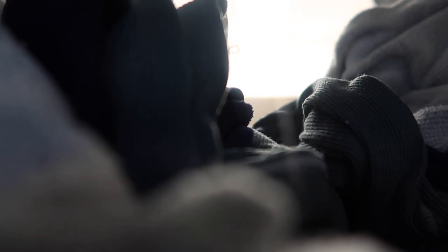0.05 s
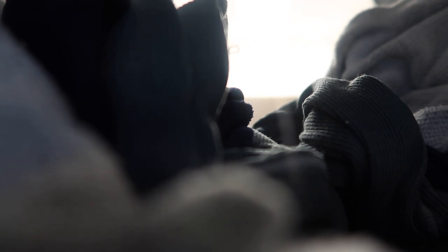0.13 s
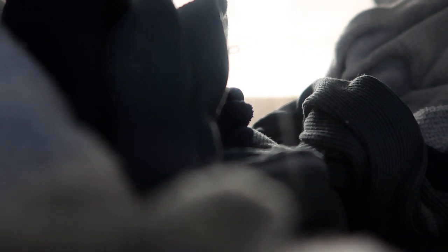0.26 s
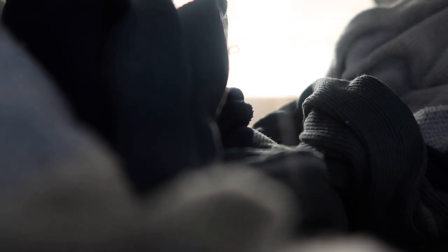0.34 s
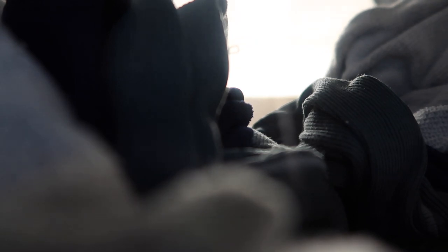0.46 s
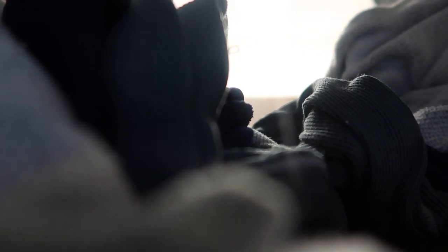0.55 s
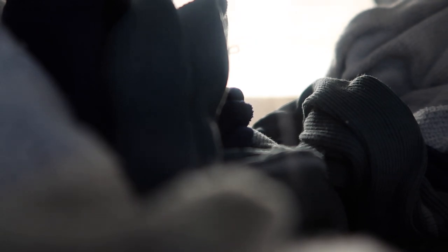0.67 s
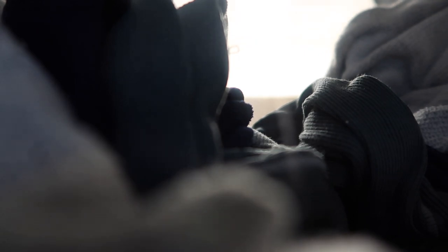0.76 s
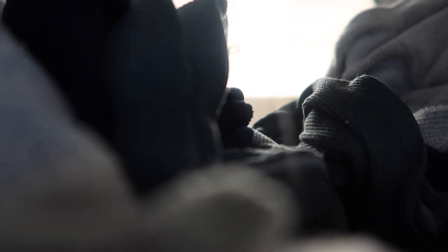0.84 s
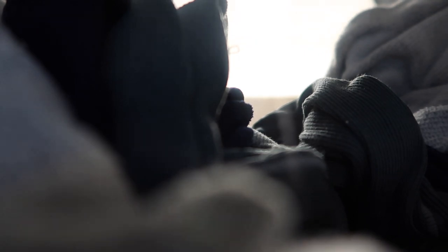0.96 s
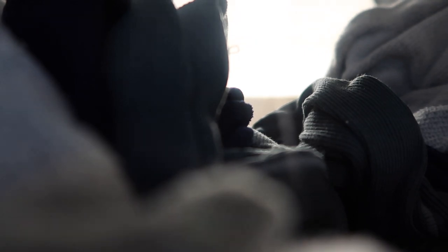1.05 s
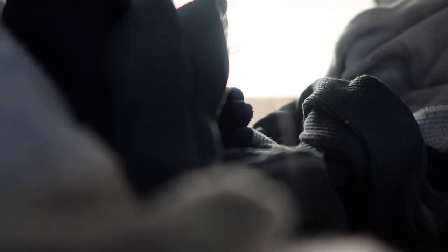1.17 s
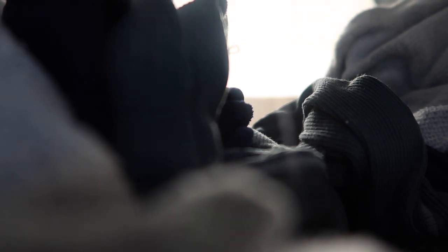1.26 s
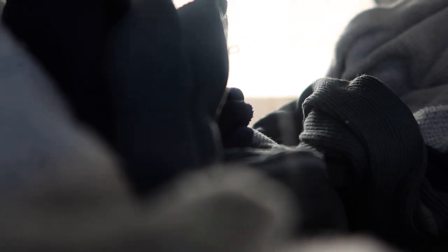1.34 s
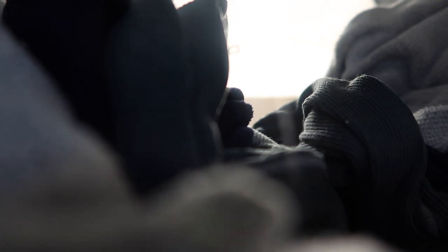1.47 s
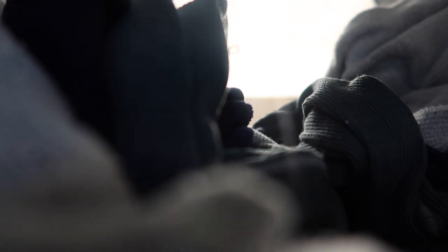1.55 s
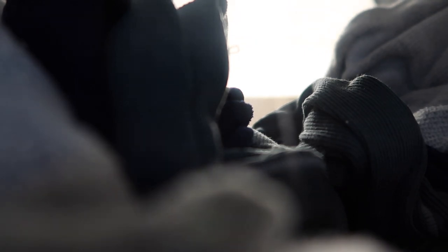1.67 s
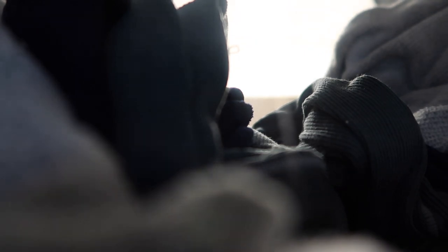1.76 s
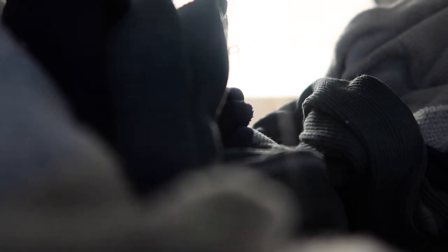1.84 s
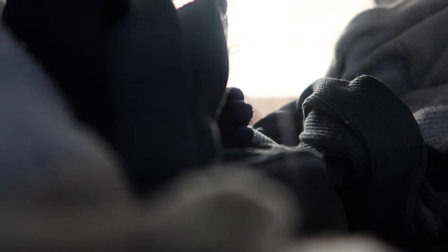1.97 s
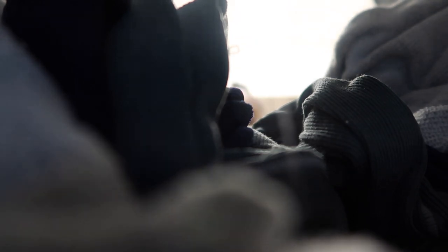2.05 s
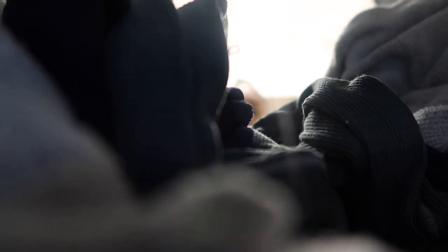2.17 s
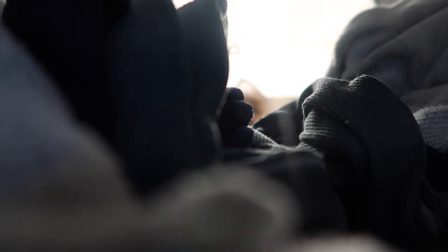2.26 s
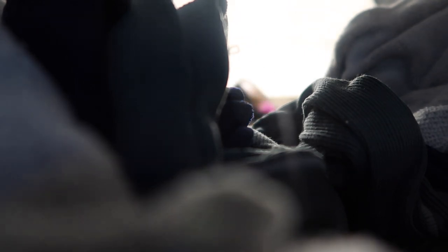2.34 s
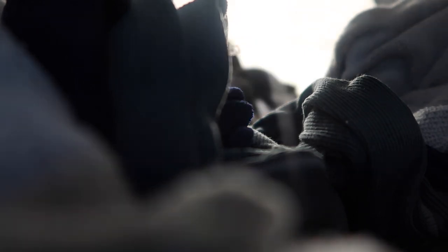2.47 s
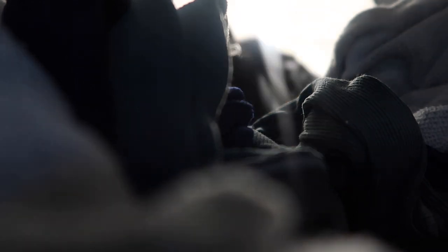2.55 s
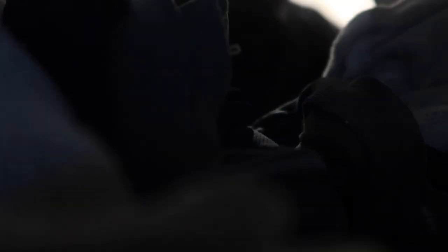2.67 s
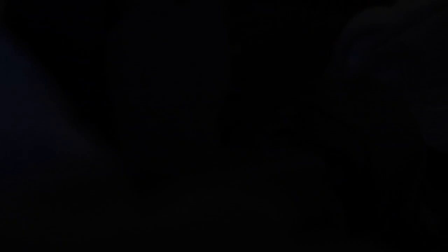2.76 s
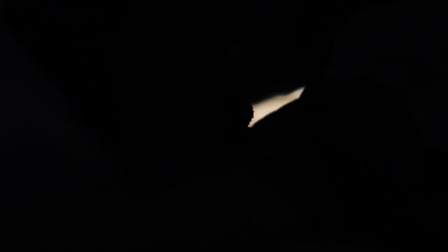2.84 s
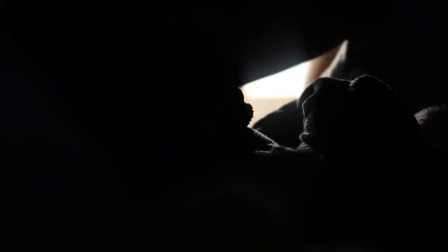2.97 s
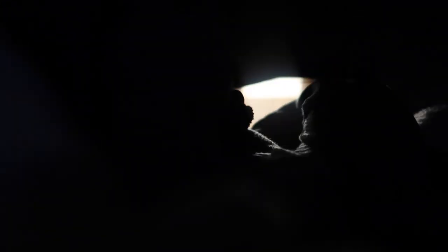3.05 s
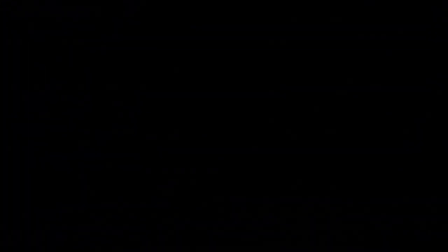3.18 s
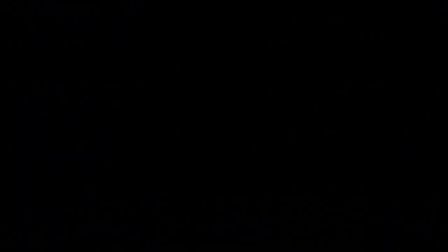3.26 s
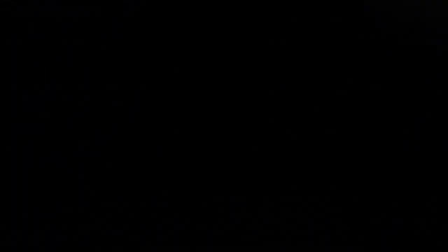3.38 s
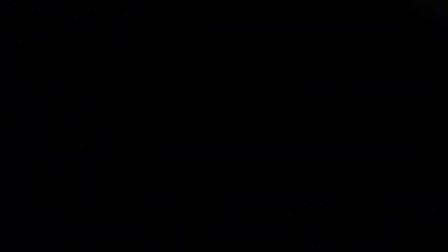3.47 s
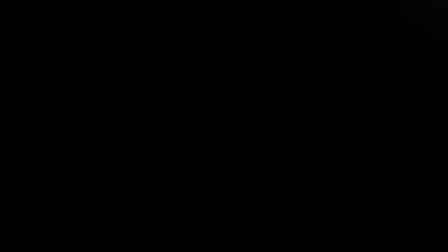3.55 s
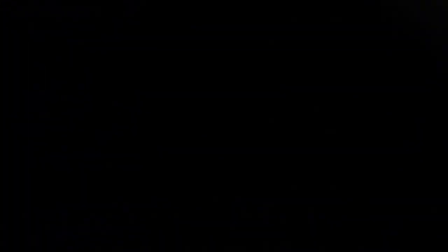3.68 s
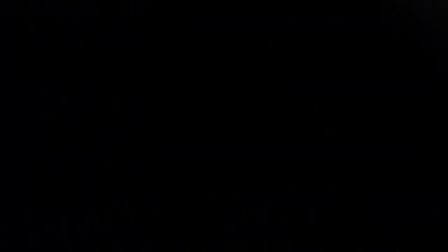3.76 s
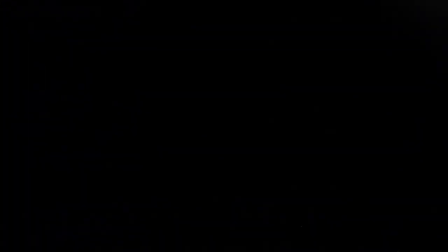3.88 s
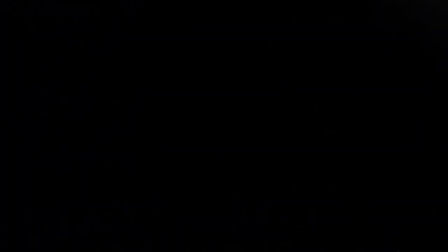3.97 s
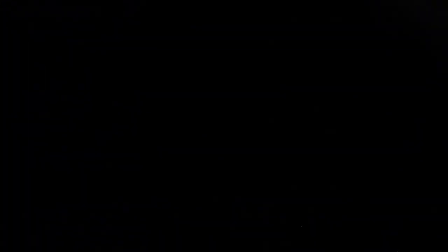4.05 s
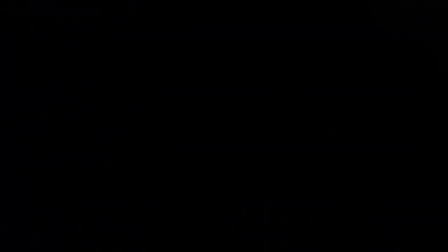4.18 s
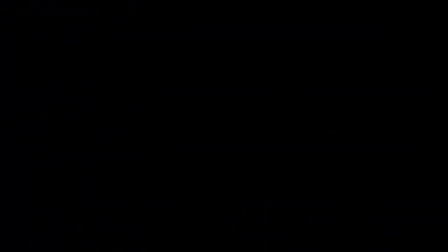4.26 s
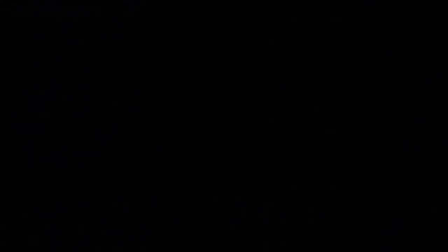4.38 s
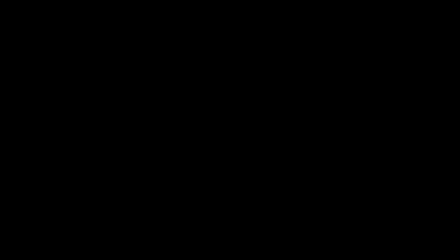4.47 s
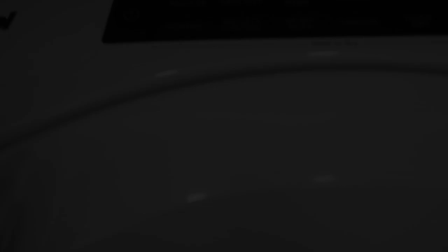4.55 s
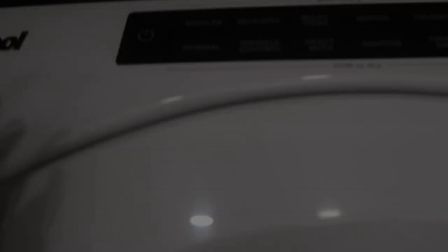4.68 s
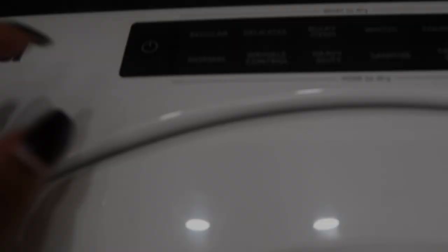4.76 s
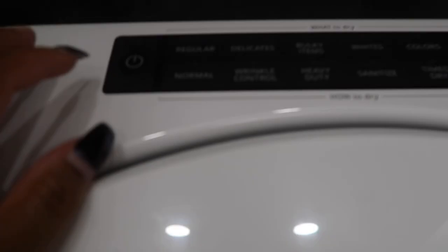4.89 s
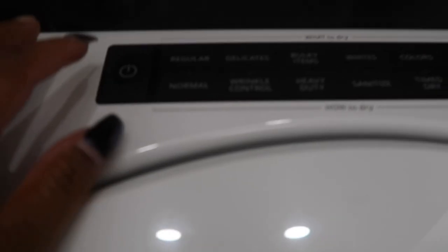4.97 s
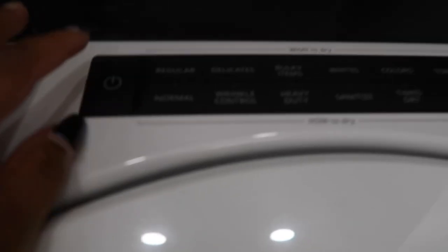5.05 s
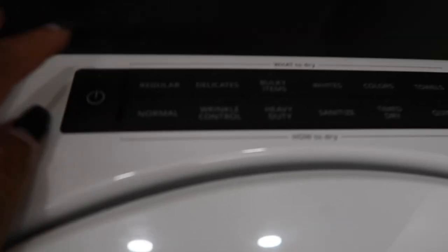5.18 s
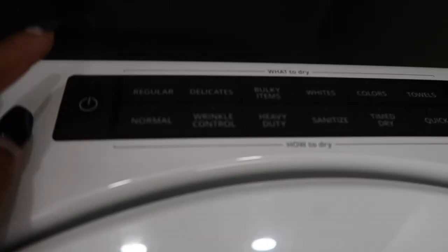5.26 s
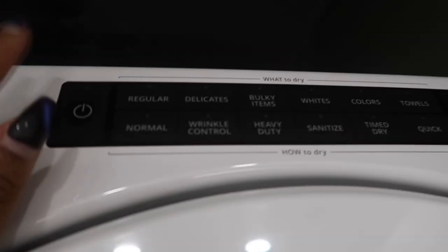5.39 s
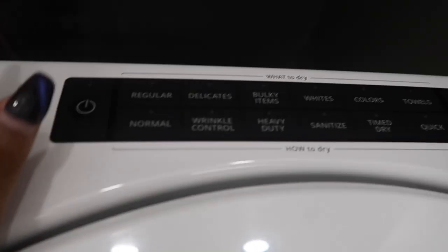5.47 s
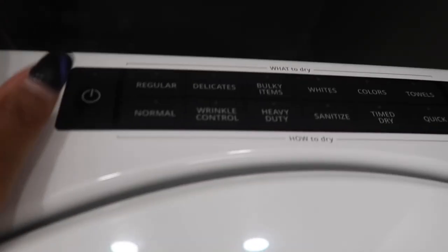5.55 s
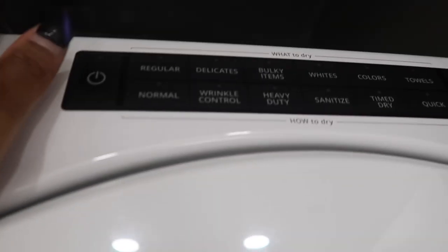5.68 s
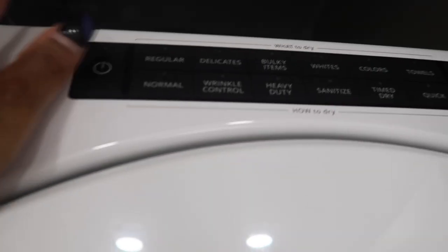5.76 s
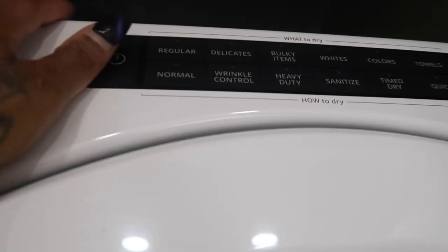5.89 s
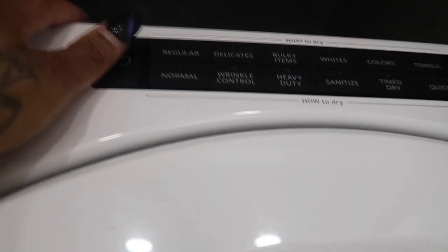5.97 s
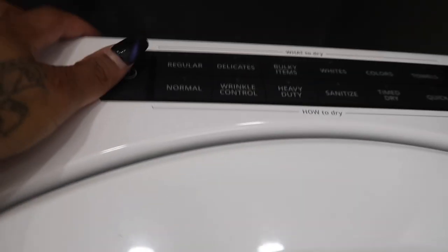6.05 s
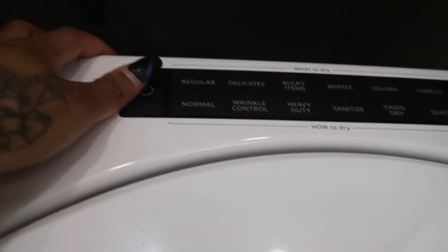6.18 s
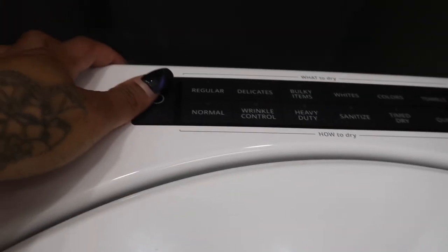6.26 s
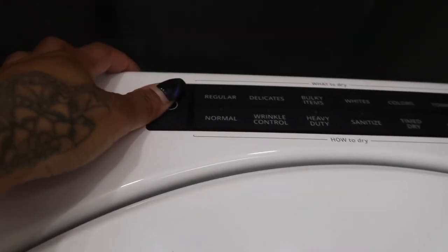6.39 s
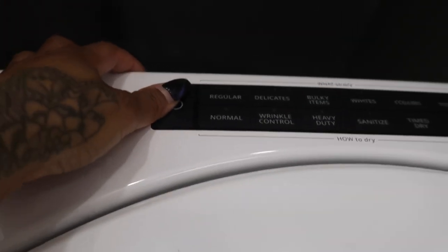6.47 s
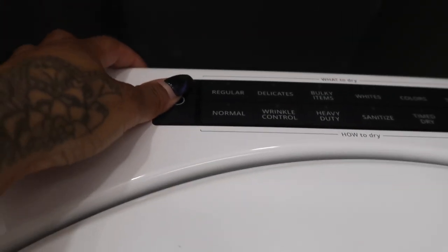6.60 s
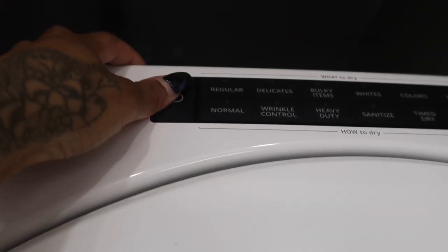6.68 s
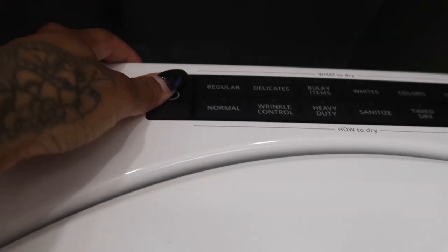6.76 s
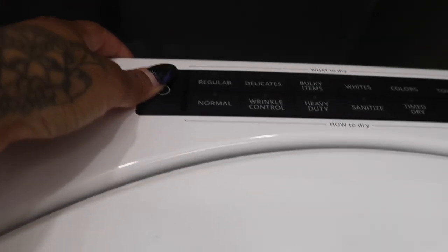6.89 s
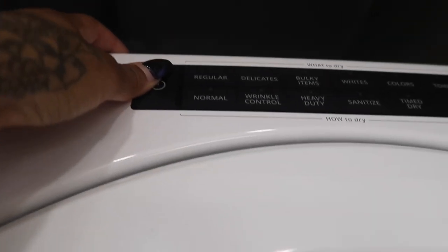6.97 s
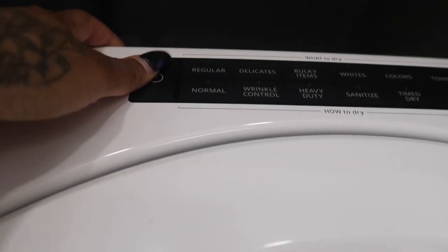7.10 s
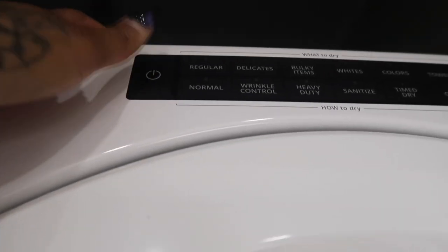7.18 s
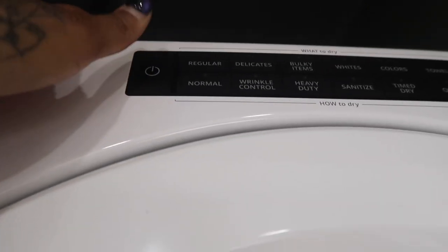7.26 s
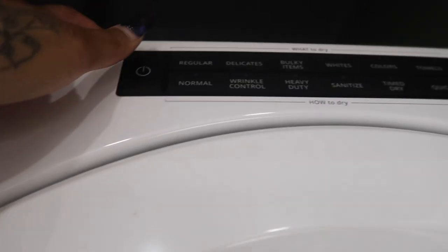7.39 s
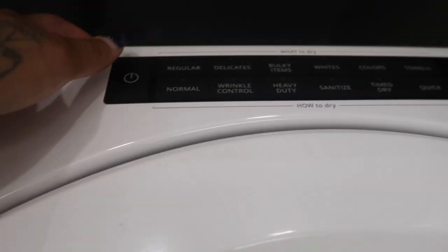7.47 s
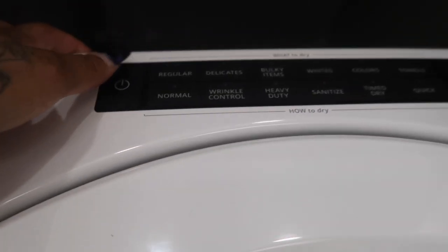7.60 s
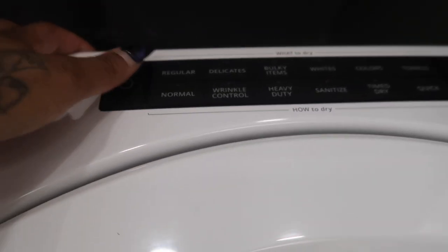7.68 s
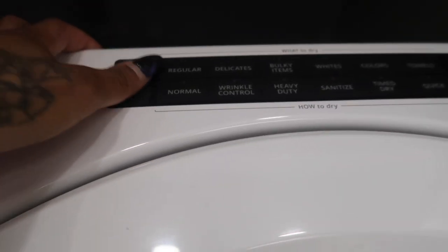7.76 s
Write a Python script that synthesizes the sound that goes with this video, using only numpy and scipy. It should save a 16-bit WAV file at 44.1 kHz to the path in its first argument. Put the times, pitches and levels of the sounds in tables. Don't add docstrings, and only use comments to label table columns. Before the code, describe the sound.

Muffled fabric swishes, a load thuds and a dryer door bangs shut with latch rattle; later, light knocks and nail clicks on the panel.

```python
import sys
import numpy as np
from scipy import signal
from scipy.fft import rfft, irfft, next_fast_len
from scipy.io import wavfile
from scipy.ndimage import uniform_filter1d, minimum_filter1d

SR = 44100
rng = np.random.default_rng(int(sys.argv[2]) if len(sys.argv) > 2 else 0)


def inscribe(sig):
    pcm = np.round(np.clip(np.atleast_2d(sig).T, -1, 1) * 32767)
    wavfile.write(sys.argv[1], SR, pcm.astype(np.int16))


def elevation(decibels):
    levels = np.asarray(decibels, float)
    return 10 ** (levels / 20)


N = 345325

# frequency in Hz, level in dB, T60 in seconds.
CATCH_MODES = [(684, -3.5, 0.059), (1335, -4.5, 0.11), (1504, 0, .052), (1630, -2, 0.076),
               (2089, -8, 0.084), (2660, -9.5, 0.14), (3610, -13, 0.071), (3989, -12, .067),
               (5120, -14, 0.065)]


def evened(x):
    return x / np.sqrt(np.mean(x ** 2) + 1e-20)


def read(points, hz):
    f, value = np.transpose(points)
    return np.interp(np.log(hz + 1), np.log(f + 1), value)


def add(mix, s, sound):
    part = mix[..., round(s * SR):][..., :sound.shape[-1]]
    part += sound[..., :part.shape[-1]]


def resonate(x, hz, width):
    turn = np.exp(2j * np.pi * np.cumsum(hz * np.ones(x.shape[-1])) / SR)
    pole = np.exp(-np.pi * width / SR)
    smooth = signal.lfilter([1 - pole], [1, -pole], x / turn)
    return 2 * (turn * smooth).real


def coloured(x, colour):
    size = next_fast_len(len(x))
    response = elevation(read(colour, np.fft.rfftfreq(size, 1 / SR)))
    return evened(irfft(rfft(x, size) * response, size)[:len(x)])


def hiss(colour, size, patchy_db, tilt=((0, 0), (9, 0))):
    hop = size // 4
    frames, hz = N // hop + 5, np.fft.rfftfreq(size, 1 / SR)
    a, b, patches = rng.standard_normal((frames, len(hz), 3)).T
    patches = uniform_filter1d(patches, size=8, axis=0)
    patches = evened(uniform_filter1d(patches, size=10, axis=1))
    slope = np.interp(np.arange(frames) * hop / SR, *np.transpose(tilt))
    octaves = np.log2((hz + 100) / 2500)
    db = read(colour, hz)[:, None] + patchy_db * patches + np.outer(octaves, slope)
    noise = signal.istft((a + 1j * b) * elevation(db), nperseg=size, noverlap=size - hop)[1]
    return evened(noise[:N])


def lumps(per_s, depth_db):
    lowpass = signal.butter(3, per_s, fs=SR, output="sos")
    wander = signal.sosfilt(lowpass, rng.standard_normal(N))
    return evened(elevation(depth_db * evened(wander)))


def strokes(rows):
    t = np.arange(0, N + 32, 32) / SR
    s, db, rise, fall, last = (np.array(rows).T[[0, 1, 2, 3, -1]])[..., None]
    time_20db = np.maximum(np.where(t < s, rise, fall), 1 / SR)
    gains = elevation(np.maximum(db - 20 * abs(t - s) / time_20db, -200))
    total = gains.sum(0)
    whole = np.arange(N) / SR
    return np.interp(whole, t, total), np.interp(whole, t, (gains * last).sum(0) / total)


def cloth():
    # peak in seconds, level in dB, 20 dB rise and fall in seconds, brightness in dB per octave.
    rubs = [(.2, -55.5, 0.35, 0.46, 2), (.55, -62.5, .6, 0.73, -1), (1.17, -63.5, 1.04, 0.19, 2),
            (1.47, -51.5, 0.41, 0.22, -0.7), (1.8, -57, 1.42, 1.15, 3), (2.29, -62.5, 0.081, 0.98, 8),
            (2.84, -50, 0.062, 0.076, -1), (2.92, -38.5, 0.75, 0.28, 0.84), (3.025, -39.5, 0.13, 0.033, 2),
            (3.09, -40, 0.28, 0.17, -0.5), (3.17, -31.5, 0.034, 0.15, -4), (3.27, -42.5, 0.14, 0.13, -6.5),
            (3.36, -38.5, 0.22, 0.1, -7), (3.665, -43, .02, 0.089, -3), (3.804, -54.5, 0.06, 0.03, -6),
            (3.87, -41, 0.018, 0.062, -4.5), (4.13, -52, 0.59, 0.55, -4.5), (4.474, -47.5, 0.15, 0.059, -4),
            (4.6, -48, 0.016, 0.11, 5.5), (5.19, -52, 0.47, .3, 5.5), (5.29, -44.5, 0.1, 0.19, 5.5),
            (5.53, -48, 0.013, .14, 2.5), (7.07, -48, .006, .1, 2.5), (7.2, -56, 0.0067, 0.088, -7.5),
            (7.67, -53, 0.0088, 0.91, 3), (7.75, -46, .012, 0.063, .1)]
    # frequency in Hz, level in dB.
    rub_colour = [(180, -22), (320, 0.5), (450, -11.5), (700, -3.5), (1100, -5.5), (1600, -5), (2900, -8),
                  (7800, -25.5), (10000, -36.5), (12000, -46), (13500, -76)]
    rub_side = [(410, -36), (700, -5), (884, -16), (1540, -11), (3920, 5), (11200, -5.5), (13600, -8),
                (15500, -29)]
    gain, slope = strokes(rubs)
    every = N // 3000
    tilt = np.transpose([np.arange(0, N, every) / SR, slope[::every]])
    mid = hiss(rub_colour, size=512, patchy_db=1.0, tilt=tilt)
    side_db = -13.5 + 0.24 * abs(slope)
    side = elevation(side_db) * coloured(rng.standard_normal(N), rub_side)
    return gain * np.array([mid, side]) * lumps(per_s=36, depth_db=1.07)


def boom():
    # peak in seconds, level in dB, 20 dB rise and fall in seconds, mode in Hz.
    jolts = [(.12, -39.5, 0.35, 0.33, 84.5), (.3, -33, 0.047, 0.15, 69), (.46, -41.5, 0.083, 0.11, 112),
             (.63, -41, 0.13, 0.49, 103), (.9, -43.5, 0.036, 0.083, 85), (1.17, -38.5, 0.11, 0.036, 92),
             (1.33, -37.5, 0.2, 0.26, 105), (1.42, -41, 0.056, 0.04, 97), (1.55, -34.5, 0.49, 0.35, 66),
             (1.9, -51, 0.75, 0.068, 106), (2.43, -44, 1, 0.1, 93.6), (2.85, -32.5, 0.46, 0.18, 62.3),
             (3.02, -37, 0.47, 0.17, 70), (3.24, -26.5, 0.21, 0.27, 65.6), (3.37, -29.5, 0.37, 0.028, 57),
             (3.41, -36.5, 0.046, 0.37, 58), (3.69, -31, 0.072, 0.25, 88), (3.888, -26, 0.051, 0.05, 70),
             (3.99, -33, 0.084, 0.36, 71), (4.218, -38.5, .2, 0.044, 73), (4.39, -43, 0.074, 0.56, 81),
             (4.59, -43, 0.047, 0.13, 110)]
    rumble = [
        (4.95, -48, 0.14, 0.22, 62),
        (5.72, -45, 0.79, 0.4, 119),
        (6.12, -48.5, .12, .15, 113),
        (6.8, -45.5, 0.87, 1, 123),
        (7.76, -50, .2, .2, 68.5),
    ]
    gain, centre = strokes(jolts + rumble)
    shake = resonate(rng.standard_normal(N), centre, 57.4)
    shake = evened(resonate(shake, centre, 54.4))
    swell = np.sqrt(uniform_filter1d(shake ** 2, size=900) + 0.075)
    highpass = signal.butter(2, 42, "high", fs=SR, output="sos")
    shake = signal.sosfilt(highpass, shake / swell ** 0.44)
    return uniform_filter1d(gain, size=500) * evened(shake) * elevation([[0], [-30]])


def tumble():
    # peak in seconds, level in dB, 20 dB rise and fall in seconds.
    thuds = [(3.11, -45, 0.055, 0.24), (3.165, -40, 0.07, 0.037), (3.175, -23, 0.0038, 0.13),
             (3.222, -21, 0.07, 0.044), (3.262, -20, 0.024, 0.13), (3.345, -26, 0.15, 0.02),
             (3.365, -36, .02, 0.21), (3.66, -47, 0.1, 0.072), (3.5, -51, .2, .3),
             (3.856, -37.5, 0.14, 0.1), (4.478, -36.5, 0.081, 0.08), (4.594, -50, 0.033, 0.071)]
    # frequency in Hz, level in dB.
    thud_colour = [(59, -24.5), (100, 4), (135, -7), (242, -6), (275, -1), (317, -22), (360, -0.5),
                   (560, -15.5), (664, -19.5), (1000, -23), (3000, -41), (3900, -66), (6600, -120)]
    thud_side = [(35, -40), (60, -19), (113, -8), (286, -5), (346, -7.5), (554, -12), (669, -16.5),
                 (1500, -21.5), (1950, -42), (3300, -120)]
    mid = hiss(thud_colour, size=512, patchy_db=4.5)
    side = elevation(-12.5) * coloured(rng.standard_normal(N), thud_side)
    return strokes(thuds)[0] * np.array([mid, side]) * lumps(per_s=240, depth_db=2.5)


def pushes():
    # start in seconds, peak in dB, frequency in Hz, number of cycles.
    presses = [(1.15, -27.5, 107, 5.8), (1.357, -18.5, 106, 9.2), (1.455, -29, 155, 5.2),
               (3.097, -26.5, 268, 10), (3.145, -23.5, 268, 8.8), (3.176, -23, 91, .61),
               (3.2512, -7, 410, 0.89), (3.26, -7.5, 74.4, 1.6), (3.277, -15.5, 45.7, 1.9),
               (3.2875, -16, 330, 1.01), (3.262, -11.5, 328, 1.6), (3.35, -3, 75.7, 1.36),
               (3.627, -32.5, 477, 5.8), (3.687, -26, 97, 1.4), (5.068, -32, 620, 12),
               (5.106, -30.5, 558, 27), (3.878, -16.5, 80.5, 1.6), (4.38, -35.5, 78.4, 2.4),
               (5.0635, -18, 300, 1.15), (5.241, -28.5, 177.8, 10.7), (5.915, -33, 152, 2.6),
               (7.0585, -27, 176, 1.5), (7.665, -35, 152, 1.7)]
    rebounds = [(3.172, -12, 460, 2.8), (3.329, -15, 300, 1.1), (3.3425, -11, 280, 0.93),
                (3.349, -15, 330, 1.2), (7.069, -26, 240, 1.3), (3.2502, -6.5, 620, 1.83),
                (3.2525, -3, 124, 1.02), (3.307, -8.5, 77, 1.3), (3.327, -14.5, 102, 1.4),
                (4.201, -25.5, 74.4, 3), (5.142, -21.5, 415, 1.34)]
    rocks = [
        (3.19, -13.5, 252, 2.3),
        (3.203, -14, 124, 2.16),
        (3.258, -15, 220, 2.4),
        (3.279, -17.5, 199, 3.5),
        (3.2725, -2.5, 248, 1.19),
        (3.283, -25, 111, 1.1),
    ]
    lean = 0.023
    out = np.zeros((2, N))
    for rows, sign, side in ((presses, 1, lean), (rebounds, -1, lean), (rocks, 1, .95)):
        for s, db, hz, cycles in rows:
            u = np.arange(0, 1, hz / cycles / SR)
            swell = np.sin(np.pi * u ** 0.7) ** 1.1
            turn = 2 * np.pi * cycles * u ** 1.025
            add(out, s, sign * elevation(db) * swell * np.array([np.sin(turn), side * np.cos(turn)]))
    return signal.sosfilt(signal.butter(4, 2500, fs=SR, output="sos"), out)


def ticks():
    # start in seconds, peak in dB, centre in Hz, T60 in seconds.
    latch = [(2.268, -43, 2000, 0.55), (3.159, -34, 1490, 0.05), (3.17, -15.5, 770, 0.031),
             (3.237, -22, 1810, 0.036), (3.25, -21, 800, 0.026), (3.63, -38, 445, 0.043),
             (3.654, -24.5, 1700, 0.11), (3.653, -36.5, 3960, 0.057), (3.794, -42, 2300, 0.12),
             (3.855, -35, 3440, 0.032), (3.856, -26.5, 500, 0.038), (3.88, -36, 2500, 0.057),
             (4.022, -45, 2490, .017), (4.055, -48.5, 3000, 0.028), (4.21, -37.5, 3770, 0.016),
             (4.235, -46, 5000, 0.025), (4.449, -32, 900, 0.024), (4.464, -38, 1000, .035),
             (4.597, -52, 2200, 0.13)]
    nails = [
        (5.0636, -34, 950, 0.05),
        (5.118, -40, 596, 0.15),
        (5.144, -34.5, 1200, 0.028),
        (5.192, -29.5, 2250, 0.062),
        (5.25, -32, 3200, 0.03),
        (5.276, -31, 2600, 0.032),
        (7.0563, -32.5, 1450, 0.049),
        (7.193, -33.5, 710, 0.038),
        (7.662, -36, 890, 0.063),
        (7.748, -38, 2780, 0.052),
    ]
    # start in seconds, peak in dB, frequency in Hz, T60 in seconds, spread in octaves.
    small_parts = [(.989, -37, 700, 0.062, 0.04), (1.11, -49, 716, 0.63, 0.027), (1.44, -46, 1654, .2, .03),
                   (1.75, -57, 1730, 2.5, 0.04), (4.884, -25.5, 1110, 0.03, 0.052),
                   (4.883, -44.5, 3300, .039, 0.14), (5.527, -39, 1090, 0.088, 0.23),
                   (5.525, -42, 3600, 0.29, 0.13), (5.524, -50, 5030, 0.5, 0.027),
                   (8.3, -34.5, 1450, 0.083, 0.1), (5.523, -52, 5750, 0.12, .04),
                   (7.703, -45, 2400, .06, .3)]
    buzz = [
        (3.186, -34.5, 5150, 0.36, 0.29),
        (3.237, -38.5, 5400, .15, 0.24),
    ]
    # frequency in Hz, level in dB.
    edge_colour = [(590, -37), (1000, -15), (1490, -9), (5150, -3), (6260, -7), (12600, -13), (15500, -30)]
    # spread in octaves where missing, and edge level at 1 kHz in dB
    rows = [(*row, 0.67, -17.5) for row in latch]
    rows += [(*row, -27) for row in small_parts]
    rows += [(*row, 1.17, -12) for row in nails]
    rows += [(*row, -12.5) for row in buzz]
    out, t = np.zeros((2, N)), np.arange(12288) / SR
    grit = rng.standard_normal((len(rows), 2, len(t)))
    octave = np.log2(np.fft.rfftfreq(len(t), 1 / SR) + 1)
    for (s, db, hz, t60, spread, edge_db), (a, b) in zip(rows, grit):
        band = np.exp(-.5 * ((octave - np.log2(hz)) / spread) ** 2)
        body = evened(irfft(rfft(a) * band))
        snap = np.roll(irfft(band), 24)
        body /= np.sqrt(uniform_filter1d(body ** 2, size=200) + 0.043)
        body += 2 * min(spread, 1) * snap / snap.max()
        onset = np.minimum(t * np.sqrt(spread) / 0.00026, 1)
        ending = np.minimum((t[-1] - t) / .05, 1)
        late = 0.073 * min(3.1 * spread, 1) * elevation(-15 * t / t60)
        decay = onset * ending * (elevation(-60 * t / t60) + late)
        edge_gain = elevation(edge_db + 9.2 * np.log2(hz / 1000))
        edge = edge_gain * coloured(b, edge_colour)
        add(out, s, .5 * elevation(db) * decay * np.array([body, edge]))
    return out


def strikes():
    # frequency in Hz, level in dB, T60 in seconds.
    lid = [(161.7, 0, 0.18), (345.7, -5, 0.25), (620, -8, 0.11), (800, -17.5, .08), (1430, -20, 0.069),
           (1960, -25, .06)]
    trim = [(1360, -6, 0.054), (1690, -7, .06), (1990, -6, 0.088), (2286, -11.5, 0.14), (2900, -19, 0.086),
            (3540, -0.5, 0.045), (4220, -11, 0.057)]
    button = [(2135, 1.5, 0.076), (2202, 0, 0.11), (2340, -3, .07), (2500, -7, .07), (4050, -9, .04)]
    # start in seconds, level in dB.
    lid_blows = [
        (5.0634, -25),
        (5.112, -34),
        (5.124, -32),
        (5.152, -30),
        (5.168, -30),
        (5.204, -30),
        (7.0593, -37),
        (7.195, -38.5),
    ]
    catch_blows = [ (3.1715, -33), (3.196, -38), (3.2375, -35), (3.2502, -32), (3.289, -37), (3.32, -39),
                   (3.343, -30.5), (3.6538, -30), (3.675, -40), (3.855, -43.5), (4.465, -48), (4.596, -51)]
    trim_blows = [
        (5.122, -48),
        (5.144, -47),
        (5.1925, -40),
        (5.2495, -47),
        (5.2755, -38),
        (7.0565, -43.5),
        (7.193, -50),
        (5.528, -52),
    ]
    button_blows = [
        (7.66, -49),
        (7.7025, -41.5),
        (7.748, -47),
    ]
    contact_s = 0.00083
    out, t = np.zeros(N), np.arange(SR // 4) / SR
    parts = ((lid, lid_blows), (CATCH_MODES, catch_blows), (trim, trim_blows), (button, button_blows))
    for modes, blows in parts:
        hz, db, t60 = np.array(modes).T[..., None]
        scatter = rng.standard_normal((len(blows), 2, len(modes), 1))
        for (s, blow_db), (place, detune) in zip(blows, scatter):
            decay = elevation(blow_db + db + 2.54 * place - 60 * t / t60)
            rings = decay * np.sin(2 * np.pi * hz * (1 + 0.0078 * detune) * t)
            add(out, s, (1 - np.exp(-t / contact_s)) * rings.sum(0))
    return out * elevation([[0], [-21]])


def chatter():
    # peak in seconds, level in dB, 20 dB rise and fall in seconds.
    rattles = [(3.173, -39, .02, 0.034), (3.2, -46, 0.023, 0.041), (3.3, -42, 0.03, 0.036),
               (3.347, -37, 0.024, 0.054), (3.44, -51, 0.094, 0.089), (3.575, -58.5, 0.067, .08),
               (3.68, -44.5, .03, 0.24), (3.81, -53, 0.019, 0.031), (4.467, -48, .006, .06),
               (4.598, -53.5, .005, .15)]
    knocks_per_s, damping = 900, 5
    knocks = (rng.random(N) < knocks_per_s / SR) * rng.standard_normal(N)
    decay = damping * np.log(1000) / np.pi
    rung = np.zeros(N)
    for hz, db, t60 in CATCH_MODES[1:7]:
        once = resonate(knocks, hz, decay / t60)
        rung += elevation(db) * evened(resonate(once, hz, 2 * decay / t60))
    return strokes(rattles)[0] * evened(rung) * elevation([[0], [-11]])


def drag():
    # peak in seconds, level in dB, 20 dB rise and fall in seconds.
    slides = [
        (5.066, -30.5, 0.0015, 0.12),
        (5.15, -34, 0.13, 0.28),
        (5.28, -44.5, 0.24, 0.046),
        (7.066, -38.5, 0.01, 0.15),
        (7.15, -48.5, 0.24, 0.15),
        (7.206, -39, 0.03, 0.03),
        (7.26, -46.5, 0.088, 0.71),
        (7.676, -32, 0.014, 0.0094),
        (7.758, -41, 0.23, 0.062),
    ]
    # frequency in Hz, width in Hz, level in dB.
    panel = [(166.5, 39, 2), (331, 36, -3.5), (568, 28, -7.5), (808, 18, -9)]
    bumps = rng.standard_normal(N) * lumps(per_s=55, depth_db=2.5)
    rung = np.zeros(N)
    for hz, width, db in panel:
        once = resonate(bumps, hz, 3.2 * width)
        rung += elevation(db) * resonate(once, hz, 3.2 * width)
    return strokes(slides)[0] * evened(rung) * elevation([[0], [-22]])


def room(x):
    # frequency in Hz, T60 in seconds.
    room_t60 = [(100, .3), (1000, 0.44), (4000, 0.23), (12000, 0.17)]
    taps = np.zeros((2, SR // 2))
    at = np.arange(200, SR // 2 - 20, 20) + rng.integers(0, 20, (2, (SR // 2 - 201) // 20))
    np.put_along_axis(taps, at, rng.choice([-1., 1.], at.shape), 1)
    hz, t, z = signal.stft(taps, SR, nperseg=256)
    decay = elevation(-60 * t / read(room_t60, hz)[:, None])
    tail = signal.istft(z * decay, SR, nperseg=256)[1]
    return signal.oaconvolve(x[None], tail / np.linalg.norm(tail[0]), axes=1)[:, :N]


def air():
    # frequency in Hz, dB per Hz.
    drum_mid = [(12, -42), (20, -13), (103, -10), (163, -14), (182, -7.5), (219, -19), (258, -1.5),
                (375, -15.5), (407, -20.5), (888, -24.5), (1070, -25.5), (2100, -32), (12400, -48),
                (16100, -78), (22000, -120)]
    drum_side = [(18, -51), (30, -23), (317, -1), (350, -11), (407, -2.5), (608, -12), (954, -11.5),
                 (12000, -38), (15600, -65), (22000, -120)]
    room_mid = [(12, -44), (20, -5.5), (65, -26), (88, -36), (100, -43), (118, -7.5), (356, -6.5),
                (386, -10.5), (466, -12.5), (1440, -28), (4010, -36.5), (5100, -38), (12400, -52),
                (16100, -73), (22000, -120)]
    room_side = [(18, -47), (30, -15), (387, -1.5), (523, -8.5), (2950, -20), (3980, -21), (4990, -25),
                 (12000, -37), (15600, -69), (22000, -120)]
    # time in seconds, gain in dB.
    level_control = [
        (3.1, -14),
        (3.3, -27),
        (3.56, -16.5),
        (3.9, -15.5),
        (4.3, -11),
    ]
    # frequency in Hz, level in dB.
    mains_hz, mains_db = (60, -44.5)
    move_s = 4.53
    t = np.arange(N) / SR
    outside = np.clip((t - move_s) / 0.21 + .5, 0, 1)
    layers = [(drum_mid, -38), (drum_side, -43.5), (room_mid, -36), (room_side, -45)]
    hum = np.array([elevation(db) * hiss(colour, size=2048, patchy_db=0.53) for colour, db in layers])
    hum = signal.sosfilt(signal.butter(10, 12900, fs=SR, output="sos"), hum)
    mains = elevation(mains_db) * np.sqrt(2) * np.sin(2 * np.pi * mains_hz * t) * np.array([[1], [0]])
    both = np.sqrt(1 - outside) * hum[:2] + np.sqrt(outside) * hum[2:] + mains
    return elevation(np.interp(t, *np.transpose(level_control))) * both


def whine():
    line_hz, line_db, tick_hz, tick_db, start = (13052.5, -79.5, 3952, -76, 7)
    t = np.arange(N) / SR
    noise, chance = rng.standard_normal(N), rng.random(N)
    line = elevation(line_db) * evened(resonate(noise, line_hz, 25))
    sparks = (chance < 45 / SR) * (t > start)
    rung = resonate(resonate(sparks, tick_hz, 150), tick_hz, 150)
    ticking = elevation(tick_db) * evened(rung)
    return np.array([[0], [1]]) * (line + ticking)


def scene():
    hits = ticks()
    echoes = elevation([[-10], [-16]]) * room(hits[0])
    inside = cloth() + boom() + tumble() + pushes()
    metal = hits + echoes + strikes() + chatter() + drag()
    mid, side = inside + metal + air() + whine()
    return np.array([mid + side, mid - side])


def band_limit(x):
    return signal.sosfilt(signal.butter(12, 15750, fs=SR, output="sos"), x)


def record(dry):
    headroom = np.minimum(.8 / (abs(dry).max(0) + 1e-9), 1)
    gain = minimum_filter1d(headroom, size=401)
    gain = uniform_filter1d(uniform_filter1d(gain, size=201), size=201)
    held = signal.sosfilt(signal.butter(12, 14800, fs=SR, output="sos"), dry * gain)
    return band_limit(held)


dry = scene()
out = record(dry)
inscribe(out)
```